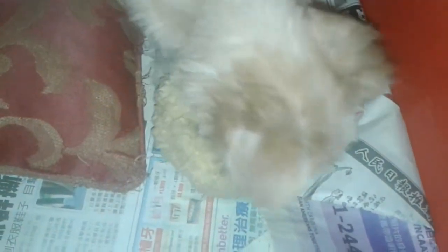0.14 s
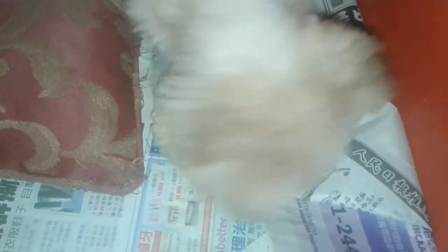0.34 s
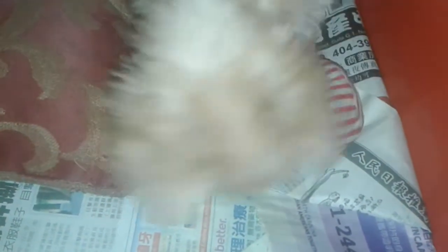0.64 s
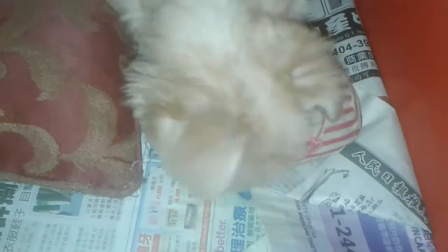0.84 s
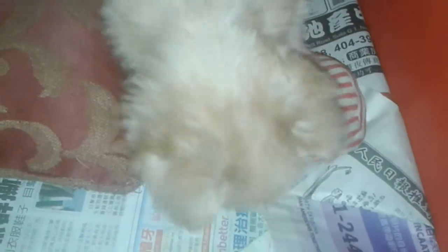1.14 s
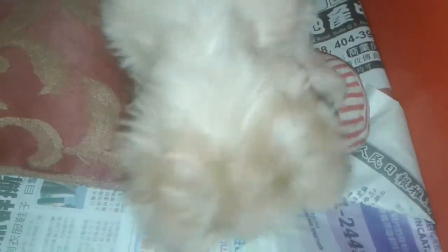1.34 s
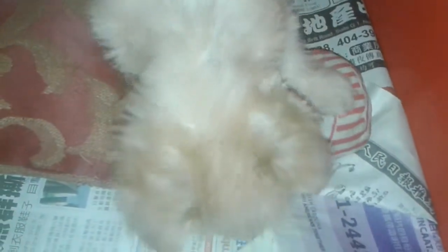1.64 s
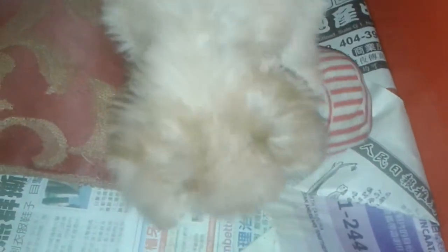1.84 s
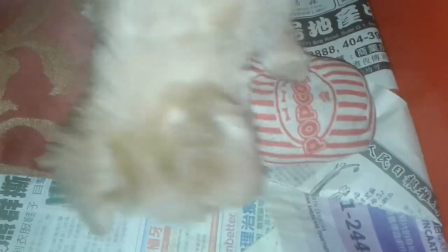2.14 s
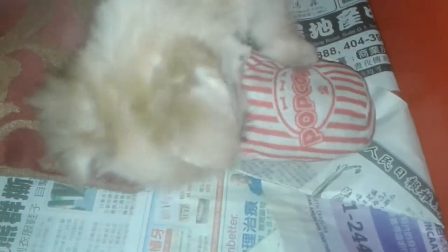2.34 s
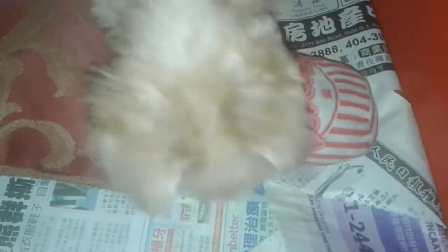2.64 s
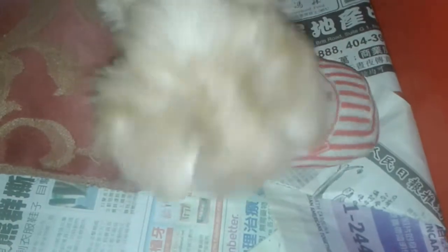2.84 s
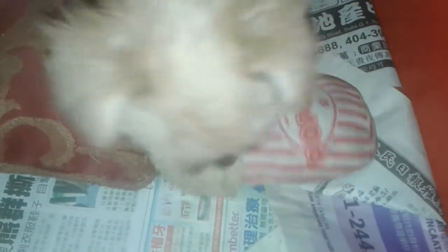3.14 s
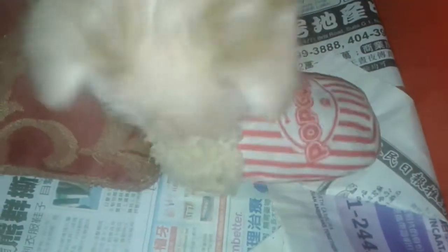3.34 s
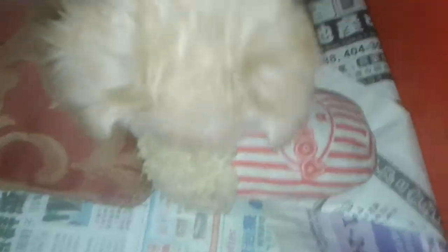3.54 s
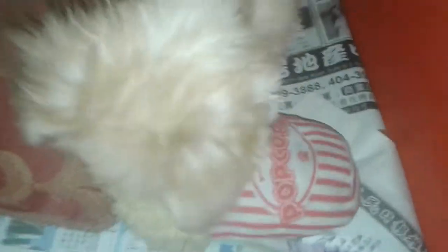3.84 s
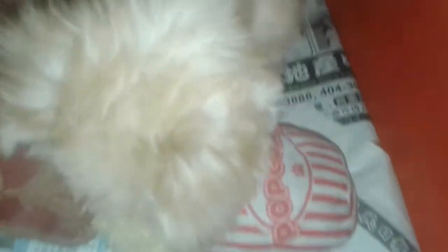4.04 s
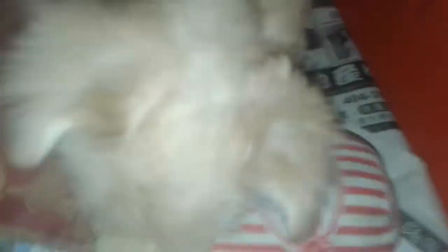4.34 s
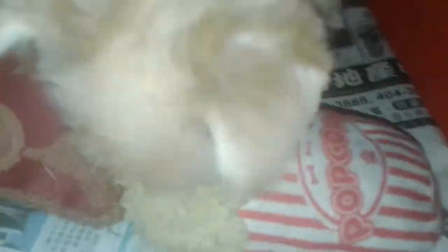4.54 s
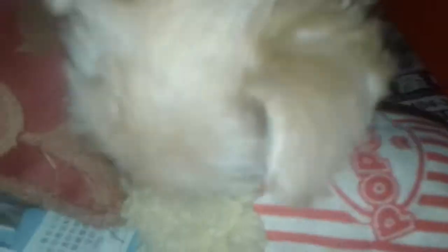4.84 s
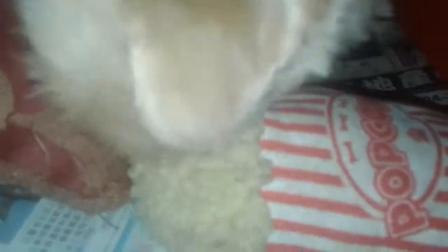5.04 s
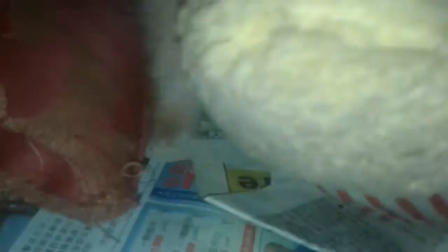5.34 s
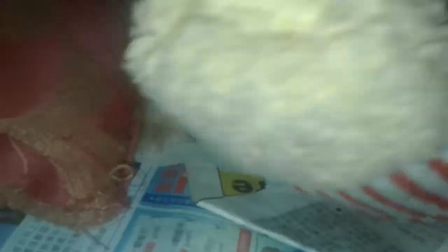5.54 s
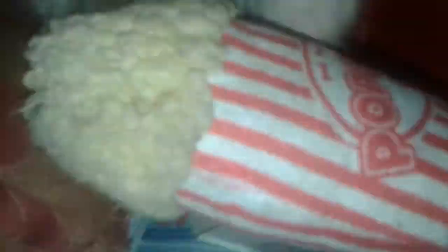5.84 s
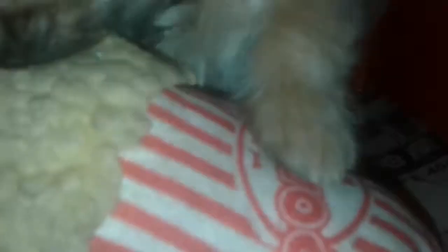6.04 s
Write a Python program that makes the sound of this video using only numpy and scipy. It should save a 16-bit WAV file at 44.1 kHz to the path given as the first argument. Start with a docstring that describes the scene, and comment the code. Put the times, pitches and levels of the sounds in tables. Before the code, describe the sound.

Fur and cloth brush across crinkling newspaper, creases snapping in uneven bursts, while two low thumps knock the floor of a still room.

```python
"""A puppy nuzzles and shoves a plush toy over newspaper in a quiet room, heard almost in mono. Soft strokes and
small snaps open it: hairs slipping by chance make the hiss, popping creases ring the sheet. A dense crackling
run follows up to 2 s, then a deep thump of paw or toy rings the floor near 2.3 s. The middle is sparser, with
faint far squeaks made of gliding, wavering sines; a second strong thump near 4.5 s brings back the busy rubbing
and snapping, over floor rumble and still air throughout."""
import sys
import numpy as np
from scipy import signal
from scipy.fft import rfft, irfft
from scipy.io import wavfile

SR = 44100
rng = np.random.default_rng(int(sys.argv[2]) if len(sys.argv) > 2 else 0)


def dump_mix(stems):
    """Bounce the given channels to the path in sys.argv[1] as a 16-bit WAV at rate SR."""
    frames = np.atleast_2d(stems).T  # one column per channel
    limited = np.clip(frames, -1, 1)  # hard clip at full scale
    pcm = np.round(limited * 32767).astype(np.int16)
    wavfile.write(sys.argv[1], SR, pcm)


N = 273420  # samples

# strokes of fur and cloth over the paper: full strength t/s, fur hiss level/dB, paper crinkle level/dB,
# sheen (7.8-11 kHz over the lower hiss) level/dB, top (above 11 kHz) level/dB, swell t/s, hold t/s, fade t/s
STROKE_TABLE = [(0.06, -65.5, -65, -2, -5, 0.16, 0.037, 0.22),
                (0.503, -45.5, -53.5, -2.5, -7, 0.049, 0.02, 0.098),
                (0.581, -46, -72, -2.5, -5, 0.12, .015, .04),
                (0.679, -49.5, -57.5, 0, -9, 0.061, 0.013, 0.038),
                (0.885, -63, -81, -6, -6, 0.025, .01, 0.076),
                (1.09, -52.5, -55, -2.5, -8, 0.12, 0.026, 0.14),
                (1.261, -57, -69, -5, -6, 0.07, 0.023, 0.028),
                (1.393, -49, -56, 1.5, 0, 0.039, 0.008, 0.018), (1.719, -55.5, -75, 1, -6, .05, .02, 0.02),
                (1.828, -66.5, -63.5, 0, -5, 0.12, .01, 0.15),
                (2.079, -58.5, -61.5, -1.5, -8, 0.13, 0.025, 0.14),
                (2.271, -54.5, -53, -1.5, -9, 0.13, 0.016, 0.14),
                (2.382, -51.5, -64, 1, -10, 0.021, 0.016, 0.15),
                (2.433, -42.5, -56.5, 0, -7, 0.088, 0.029, 0.016),
                (2.668, -57.5, -61.5, -2.5, -8, 0.16, 0.018, 0.11),
                (2.968, -69, -65, 0, -5, .03, 0.0073, 0.038),
                (3.008, -66, -60, -7, -10, 0.025, 0.013, 0.025),
                (3.117, -61, -69, -1, -9, 0.041, 0.02, 0.019),
                (3.33, -55, -67, -1, -11, 0.18, 0.017, 0.081),
                (3.806, -59, -67, 2, -16, .02, 0.0096, 0.025),
                (4.176, -74, -108, -2, -13, 0.029, 0.018, 0.1),
                (4.548, -49, -43, 17, -18, 0.01, 0.025, 0.038),
                (4.574, -43.5, -54.5, 4.5, -14, 0.052, 0.021, 0.071),
                (5.25, -46.5, -56.5, 3, -6, 0.089, .05, 0.12), (5.37, -59, -71, 3, -10, 0.1, 0.015, 0.044),
                (5.512, -62, -68.5, 5, -15, 0.12, 0.014, 0.046),
                (5.627, -54.5, -64.5, 2.5, -4, 0.16, 0.067, 0.042),
                (5.753, -62, -63.5, 4, -2, 0.027, 0.0091, 0.036),
                (5.83, -51.5, -49, -2, -6, 0.092, 0.015, 0.039),
                (5.93, -56, -61.5, -3, -6, 0.083, .02, 0.067),
                (5.965, -48.5, -62.5, 8, -11, 0.07, 0.02, 0.023),
                (6.04, -49.5, -58, 6, -10, .06, 0.012, 0.079),
                (6.112, -56.5, -58.5, 5, -5, .05, 0.013, 0.11)]
# steady contact of fur and paper between strokes: t/s, fur hiss level/dB, paper crinkle level/dB
CONTACT_CURVE = [(0.0, -71, -69), (0.2, -75, -69.5), (0.3, -76, -69.5), (0.45, -74, -62.5),
                 (0.76, -67, -67), (1.0, -64.5, -57.5), (1.2, -78, -65), (1.35, -64.5, -62),
                 (1.9, -69.5, -67.5), (2.2, -68, -70), (2.55, -73, -67.5), (2.8, -69, -66),
                 (2.86, -59, -59), (3.03, -58.5, -61), (3.18, -81, -70), (3.45, -73, -66.5),
                 (3.7, -72.5, -67.5), (4.16, -71.5, -69.5), (4.32, -57.5, -63), (4.95, -56.5, -63.5),
                 (5.1, -66, -66.5), (5.5, -64.5, -66), (5.72, -68, -71), (6.2, -65.5, -56.5)]
# quick brushes of fur: start t/s, approximate peak level/dB, length t/s
BRUSH_TABLE = [(0.6365, -29, 0.018), (0.674, -38, 0.026), (1.274, -36.5, 0.015), (1.703, -41, 0.026),
               (2.262, -36, 0.02), (2.9676, -47, 0.013), (4.545, -44, 0.022), (5.816, -31, 0.026)]
# colour of the fur hiss: f/Hz, density level/dB
FUR_COLOUR = [(880, -38.5), (1500, -6.5), (1810, -15), (2880, -7), (4590, -7), (5170, -3.5), (5540, -7.5),
              (7530, -5), (8230, -3), (10000, 1.5), (11400, -9), (15100, 0.5), (16000, -7.5)]
# edges of the bands in which the fur flickers separately: f/Hz
FUR_BAND_EDGES = [300, 1800, 2600, 3600, 4800, 6200, 7800, 9300, 11000, 13000, 17000]
# colour of the paper crinkle: f/Hz, density level/dB
CRINKLE_COLOUR = [(150, -32), (250, -1), (486, -3), (921, 1.5), (1150, 0), (1700, -3.5), (2190, -4),
                  (2880, -3), (5000, -19), (6500, -12), (11000, -120)]
# creases snapping: t/s, peak level/dB, main pitch f/Hz, modes from 1.8 kHz up level/dB
SNAP_TABLE = [(0.09, -44, 1860, -6), (0.144, -48.5, 1280, -16), (0.265, -47.5, 820, -6),
              (0.397, -46, 1150, -27), (0.493, -40, 861, 2), (0.591, -37, 2060, -1), (0.659, -32, 850, -17),
              (0.711, -42, 600, -17), (0.883, -23, 1500, -7.5), (0.967, -44, 1200, -2),
              (1.005, -30, 2750, -5), (1.022, -26, 780, -8), (1.055, -38, 980, -16),
              (1.127, -40, 1030, -21), (1.178, -36.5, 880, -12), (1.284, -27, 940, -13),
              (1.337, -34, 980, -8.5), (1.357, -27, 890, -15), (1.413, -37.5, 1440, -10.5),
              (1.446, -39.5, 840, -13), (1.531, -44.5, 694, -15), (1.552, -36, 880, -15),
              (1.56, -34, 950, -11.5), (1.591, -32.5, 1020, -16), (1.704, -26.5, 1470, -3),
              (1.804, -35, 1500, -11), (1.808, -26.5, 1060, -11), (1.829, -24, 920, -6),
              (1.954, -42.5, 818, -27), (2.086, -42, 920, -24), (2.278, -33, 600, -18),
              (2.314, -37.5, 527, -34), (2.38, -41, 2610, -6), (2.649, -47, 1400, -22),
              (2.672, -42, 1190, -17), (2.845, -44.5, 567, -22), (2.922, -43.5, 2980, -11),
              (2.97, -36, 1070, 2), (3.223, -48, 616, -2), (3.254, -30, 1060, -19),
              (3.295, -46.5, 923, -24), (3.344, -40.5, 931, -8), (4.305, -44, 580, -19),
              (4.342, -34.5, 950, -14), (4.374, -39.5, 845, -23), (4.441, -43.5, 816, -22),
              (4.508, -45, 799, -24), (4.545, -32.5, 606, -3), (4.568, -25, 1280, -1),
              (4.645, -56, 1500, 12), (4.726, -31, 855, -13.5), (4.749, -37, 544, -20),
              (5.137, -40.5, 820, -34), (5.147, -45, 746, -25), (5.193, -38.5, 625, -12),
              (5.204, -37.5, 1400, -15), (5.231, -41, 1470, 2), (5.236, -39, 580, -16),
              (5.289, -27.5, 567, -9), (5.414, -44.5, 807, -7), (5.699, -34.5, 1080, -7.5),
              (5.821, -36, 544, -15), (5.835, -34, 1500, 12), (5.847, -28, 570, -16), (5.897, -40, 1770, 2),
              (5.918, -43, 3900, -2), (5.957, -36.5, 880, 15), (6.016, -40.5, 640, -27),
              (6.038, -43, 920, -4), (6.108, -43, 888, -1)]
# modes of the paper sheet: f/Hz, level/dB, share of the snap's decay time (no unit)
PAPER_MODES = [(429, -2, 0.54), (582, -6, 1.37), (880, 2, 0.55), (1150, 4.5, 0.29), (1351, 2.5, 0.46),
               (1850, 4, 0.26), (2080, -2.5, 1), (2460, 4, 0.29), (2750, 4.5, 0.51), (3180, 3.5, 0.18),
               (4390, -7, 0.35), (5400, -6.5, 0.15), (7800, -12, 0.2), (10000, -18, 0.16)]
# thumps of paws and toy: t/s, peak level/dB, main pitch f/Hz, time until the weight settles t/s
THUMP_TABLE = [(0.46, -56, 123, 0.049), (0.668, -43.5, 328, 0.027), (1.286, -43, 224, 0.024),
               (1.338, -53, 108, 0.029), (1.408, -48, 201, 0.051), (1.831, -47.5, 261, 0.034),
               (2.276, -22, 131, 0.052), (3.44, -53.5, 330, 0.02), (3.475, -53.5, 330, 0.03),
               (3.5, -57, 220, 0.03), (4.176, -53.5, 328, 0.014), (4.196, -52.5, 200, 0.017),
               (4.343, -46, 375, 0.059), (4.532, -44, 250, 0.012), (4.546, -24, 190, 0.024),
               (4.57, -32, 177, 0.036), (4.751, -43, 161, 0.032), (5.237, -45.5, 450, 0.02),
               (5.292, -44.5, 323, 0.05), (5.8, -39.5, 116, 0.092), (5.824, -49, 96.9, 0.048),
               (5.843, -36, 144, 0.02), (5.888, -48.5, 145, 0.053)]
# modes of the floor: f/Hz, level/dB, 60 dB decay t/s
FLOOR_MODES = [(45.8, -8, 0.46), (73.3, -3.5, 0.74), (87.3, -7, 0.43), (108, -5.5, 0.39), (148, 3, 0.76),
               (169, -1.5, 0.1), (204, -7, 0.16), (260, -1, 0.244), (317, -3, 0.59), (422.4, 0.5, 0.16),
               (538, -5.5, 0.3), (685, 6, 0.058), (820, 9, 0.013), (370, 1, 0.027)]
# faint nose whistles (5-11 kHz) and far squeaks (near 1.1 kHz): start t/s, end t/s, start f/Hz, end f/Hz, peak
# level/dB
WHISTLE_TABLE = [(0.573, 0.623, 5100, 5150, -49), (0.594, 0.63, 10000, 9200, -45),
                 (0.64, 0.66, 5300, 5200, -49), (2.668, 2.713, 6200, 6300, -52),
                 (2.698, 2.763, 5700, 5300, -53), (2.984, 3.15, 1098, 1080, -49.5),
                 (3.728, 3.87, 1140, 1170, -51.5), (4.92, 5.022, 1030, 1150, -57.5),
                 (4.433, 4.479, 7800, 10640, -56.5), (4.964, 4.997, 9900, 10900, -57),
                 (5.696, 5.785, 1088, 1090, -49.5), (6.033, 6.192, 916, 900, -51)]
# steady murmur of the floor: t/s, level/dB
MURMUR_CURVE = [(0.0, -65), (1.47, -61.5), (2.23, -64), (2.4, -61.5), (2.8, -65.5), (4.33, -62.5),
                (4.58, -57), (5.09, -62), (6.2, -55.5)]
# colour of the floor rumble: f/Hz, density level/dB
RUMBLE_COLOUR = [(15, -55), (25, -36), (37, -3.5), (51, -19.5), (81, 2.5), (253, -11), (297, -17.5),
                 (334, -14), (600, -20.5), (780, -41), (1320, -120)]
# colour of the room's still air: f/Hz, density level/dB
AIR_COLOUR = [(120, -36), (200, -27), (465, -17.5), (1450, -8), (1870, -9), (2210, -19.5), (5730, -13.5),
              (6630, -20), (8730, -13.5), (10100, -20), (11300, -29), (15100, -20), (16000, -19)]
# colour of the electronics' own noise: f/Hz, density level/dB
ELECTRONICS_COLOUR = [(24, -49), (40, -14), (101, -13), (189, -2), (345, -1), (2700, -2.5), (9930, -22.5),
                      (14800, -11.5), (16000, -7.5)]

STROKE_SPAN_DB = 20  # gained over a stroke's swell, lost over its fade
CONTACT_SHEEN_DB, CONTACT_TOP_DB = -0.5, -7.5
HISS_CREST_DB = 18  # peaks of hiss above its rms
DRAG_DB = 1  # mean drag relative to the crease clumps
SNAP_T60_S = 0.029
RUMBLE_AFTER_DB, RUMBLE_T60_S = -19, 0.15  # the rumble starts this far below a thump's peak, then decays
ROOM_T60_S, ROOM_DB = 0.084, -15.5
AIR_DB, ELECTRONICS_DB = -71, -79  # rms
CUTOFF_HZ = 15800
OFFSET = -.0005  # full scale = 1


def sliding():
    """Strokes swell, hold and fade over steady contact; the louder hiss weighs more in the colour."""
    t = np.arange(N) / SR
    s, hiss_db, crinkle_db = np.transpose(CONTACT_CURVE)
    hiss = from_db(np.interp(t, s, hiss_db))
    paper = from_db(np.interp(t, s, crinkle_db))
    weighted_sheen, weighted_top = hiss * CONTACT_SHEEN_DB, hiss * CONTACT_TOP_DB
    for full, fur_db, paper_db, sheen_db, top_db, swell, hold, fade in STROKE_TABLE:
        before = (full - t) / max(swell, .01)
        after = (t - full - hold) / max(fade, .01)
        shape = from_db(-STROKE_SPAN_DB * np.maximum(np.maximum(before, after), 0))
        hairs = from_db(fur_db) * shape
        hiss = hiss + hairs
        paper = paper + from_db(paper_db) * shape
        weighted_sheen = weighted_sheen + hairs * sheen_db
        weighted_top = weighted_top + hairs * top_db
    return 20 * np.log10(hiss), weighted_sheen / hiss, weighted_top / hiss, 20 * np.log10(paper)


def fur(hiss_db, sheen_db, top_db):
    """Thousands of hairs slip at once; the colour wanders a little; quick brushes start and stop abruptly."""
    t = np.arange(N) / SR
    gain = from_db(hiss_db + 2.0 * drift(22))
    for s, db, length in BRUSH_TABLE:
        edges = np.minimum(t - s, s + length - t) / 0.002  # 2 ms ramps
        gain = gain + from_db(db - HISS_CREST_DB) * np.clip(edges, 0, 1)
    hisses = [coloured(grains(9000., spread_db=4.0), FUR_COLOUR) for _ in range(2)]
    out = 0
    for k, (low, high) in enumerate(zip(FUR_BAND_EDGES, FUR_BAND_EDGES[1:])):
        bandpass = signal.butter(2, [low, high], "band", fs=SR, output="sos")
        band = signal.sosfilt(bandpass, hisses[k % 2])  # neighbouring bands slip apart
        if low < 7000:
            tone_db = -sheen_db
        elif low > 10500:
            tone_db = top_db
        else:
            tone_db = 0
        out = out + band * from_db(tone_db + .9 * drift(5) + .9 * drift(18))
    return gain * out


def crinkle(db):
    """Small creases give way in clumps over the drag of the sheet."""
    clumps = grains(500 * from_db(7 * drift(30)), spread_db=3.0)
    drag = from_db(DRAG_DB + 1.5 * drift(9)) * rng.standard_normal(N)
    return from_db(db) * coloured(rms_one(clumps) + drag, CRINKLE_COLOUR)


def snaps():
    """A crease pops over in a few quick steps; the sheet's modes near its pitch ring most, then it settles."""
    out, t = np.zeros(N), np.arange(SR // 8) / SR
    for s, db, pitch_hz, bright_db in SNAP_TABLE:
        noise = rng.standard_normal(len(t))
        steps = noise * (rng.random(len(t)) < .05) * np.exp(-t / 0.0019)
        settling = 0.027 * noise * np.exp(-t / 0.009)
        force = .5 * steps + (t == 0) + settling
        luck_db = rng.normal(0, 1.0, len(PAPER_MODES))
        bent = 1 + .05 * rng.standard_normal(len(PAPER_MODES))  # every fold shifts the modes a little
        pop = 0
        for k, (hz, mode_db, share) in enumerate(PAPER_MODES):
            # low modes lose 7 dB per octave from the pitch, high modes follow the brightness
            near_db = -7 * abs(np.log2(hz / pitch_hz)) if hz < 1800 else bright_db
            mode = ring(force, hz * bent[k], share * SNAP_T60_S)
            pop = pop + (-1) ** k * from_db(mode_db + near_db + luck_db[k]) * mode
        add(out, s, pop, db)
    return out


def thumps():
    """A soft blow rings the floor's modes near its pitch; the settling weight then chokes all but the lowest."""
    out, t = np.zeros(N), np.arange(SR // 2) / SR
    for s, db, pitch_hz, settle in THUMP_TABLE:
        blow = np.exp(-t / 0.00033)
        shudder = 0.054 * rng.standard_normal(len(t)) * np.exp(-t / 0.023)  # stuffing shifts after the blow
        choke = 0.12 + 1.33 * np.exp(-np.maximum(t - settle, 0) / 0.0023)
        boom = 0
        for k, (hz, mode_db, t60) in enumerate(FLOOR_MODES):
            near_db = -6 * abs(np.log2(hz / pitch_hz))
            mode = ring(blow + shudder * (hz > 190), hz, t60)
            if hz > 120:
                mode = mode * choke
            boom = boom + (-1) ** k * from_db(mode_db + near_db) * mode
        add(out, s, boom, db)
    return out


def whistles():
    """Breathy nose tones and far squeaks: a gliding sine whose pitch and strength are roughened by slow noise."""
    out, waver, breath = np.zeros(N), drift(60), 1.3 + drift(50)
    for start, end, hz0, hz1, db in WHISTLE_TABLE:
        i, n = round(start * SR), round((end - start) * SR)
        u = np.linspace(0, 1, n)
        pitch_hz = (hz0 + (hz1 - hz0) * u) * (1 + 0.017 * np.resize(waver[i:], n))
        phase = 2 * np.pi * np.cumsum(pitch_hz) / SR
        envelope = np.minimum(6 * u, 1 - u) * np.resize(breath[i:], n)  # quick rise, long fall
        add(out, start, np.sin(phase) * envelope, db)
    return out


def rumble():
    """The floor murmurs all along as low noise, which jumps up at every thump and decays."""
    t = np.arange(N) / SR
    gain = from_db(np.interp(t, *np.transpose(MURMUR_CURVE)))
    for s, db, _, _ in THUMP_TABLE:
        decay_db = -60 * np.abs(t - s) / RUMBLE_T60_S
        gain = gain + (t > s) * from_db(db + RUMBLE_AFTER_DB + decay_db)
    return gain * from_db(2.0 * drift(19)) * coloured(rng.standard_normal(N), RUMBLE_COLOUR)


def room(x):
    """A short diffuse tail: decaying noise, starting after 4 ms."""
    t = np.arange(SR // 3) / SR
    tail = rng.standard_normal(len(t)) * from_db(-60 * t / ROOM_T60_S) * (t > .004)
    return from_db(ROOM_DB) * signal.fftconvolve(x, tail / np.sqrt(np.sum(tail ** 2)))[:N]


def still_air():
    """The quiet room's steady coloured noise."""
    return from_db(AIR_DB) * coloured(rng.standard_normal(N), AIR_COLOUR)


def near_mono(mid):
    """Both channels carry the same sound; only the electronics' faint steady noise sets them apart."""
    side = from_db(ELECTRONICS_DB) * coloured(rng.standard_normal(N), ELECTRONICS_COLOUR)
    return np.array([mid + side, mid - side])


def from_db(db):
    """Turn dB into gain."""
    return 10 ** (np.asarray(db) / 20)


def rms_one(x):
    """Scale to rms 1."""
    return x / np.sqrt(np.mean(x ** 2) + 1e-20)


def shaped(x, spectrum):
    """Filter x by a spectrum with minimum phase, so that nothing sounds early."""
    hz, db = np.transpose(spectrum)
    grid = np.maximum(np.fft.rfftfreq(8192, 1 / SR), 1)
    log_gain = np.interp(np.log(grid), np.log(hz), db) * np.log(10) / 20
    cepstrum = irfft(log_gain)
    cepstrum[1:4096] *= 2  # fold the late half onto the early one
    cepstrum[4097:] = 0
    return signal.fftconvolve(x, irfft(np.exp(rfft(cepstrum))))[:N]


def coloured(x, spectrum):
    """Shape x by a spectrum and scale it to rms 1."""
    return rms_one(shaped(x, spectrum))


def drift(rate):
    """Slow random wander, rms 1: noise through two equal one-pole lowpasses at rate Hz."""
    r = np.exp(-2 * np.pi * rate / SR)
    wander = signal.lfilter([1], [1, -2 * r, r * r], rng.standard_normal(N + SR))
    return rms_one(wander[SR:])  # skip the filter's first second


def grains(per_s, spread_db):
    """Random tiny slips of uneven size and either sign."""
    sizes = from_db(spread_db * np.minimum(rng.exponential(1, N), 4)) * rng.choice([-1, 1], N)
    return sizes * (rng.random(N) < per_s / SR)


def ring(force, hz, t60):
    """One decaying mode driven by a force: a two-pole resonator."""
    r, w = from_db(-60 / (max(t60, .002) * SR)), 2 * np.pi * hz / SR
    return signal.lfilter([0, np.sin(w)], [1, -2 * r * np.cos(w), r * r], force)


def add(out, s, x, db):
    """Lay x into out at s seconds with its peak at db."""
    i = max(round(s * SR), 0)
    out[i:i + len(x)] += (from_db(db) * x / np.abs(x).max())[:N - i]


def scene():
    """All sources at the microphone; only the snaps get the room tail."""
    hiss_db, sheen_db, top_db, crinkle_db = sliding()
    pops = snaps()
    rubbing = fur(hiss_db, sheen_db, top_db) + crinkle(crinkle_db)
    events = pops + room(pops) + thumps() + whistles()
    background = rumble() + still_air()
    return near_mono(rubbing + events + background)


def record(dry):
    """The microphone drops the deepest bass, the top is cut steeply, the converter adds a small offset."""
    bass_cut = signal.sosfilt(signal.butter(2, 45, "high", fs=SR, output="sos"), dry)
    top_cut = signal.ellip(12, .5, 80, CUTOFF_HZ, fs=SR, output="sos")
    return signal.sosfilt(top_cut, bass_cut) + OFFSET


dry = scene()
out = record(dry)
dump_mix(out)
```